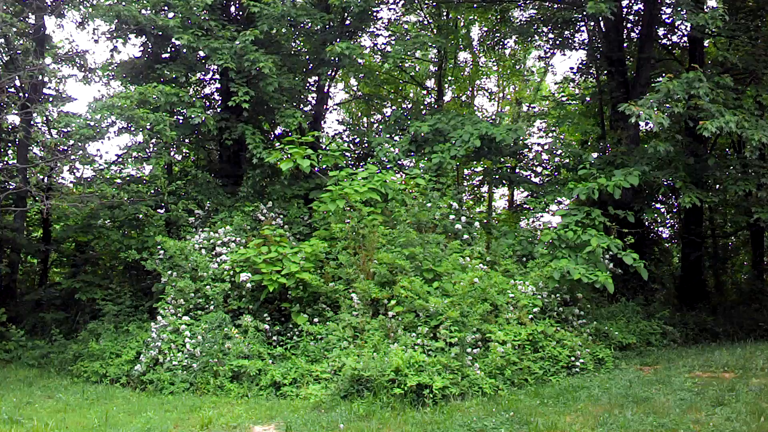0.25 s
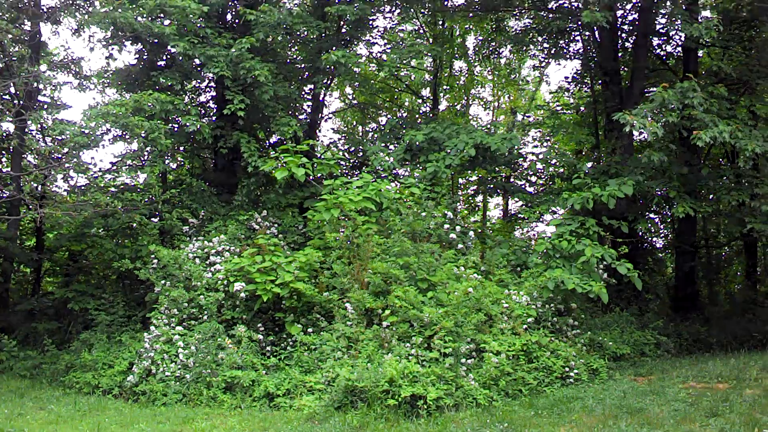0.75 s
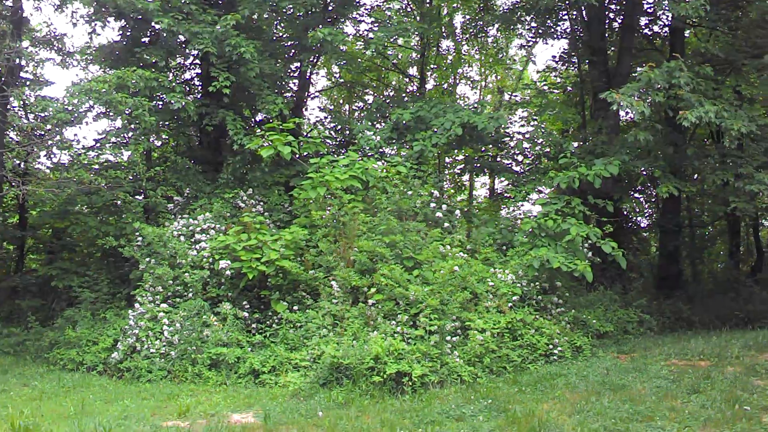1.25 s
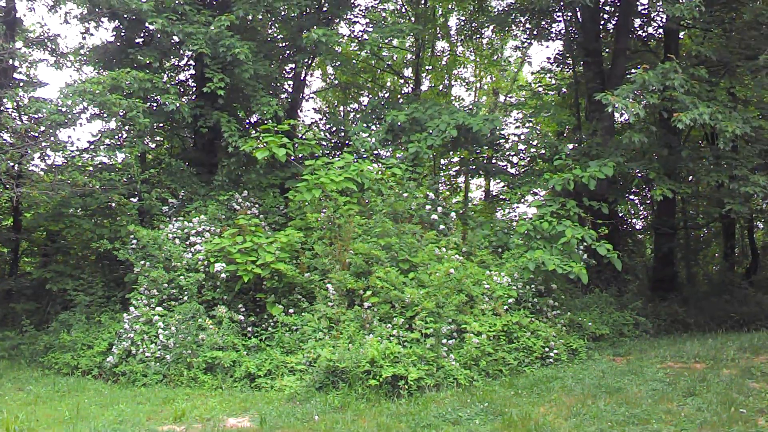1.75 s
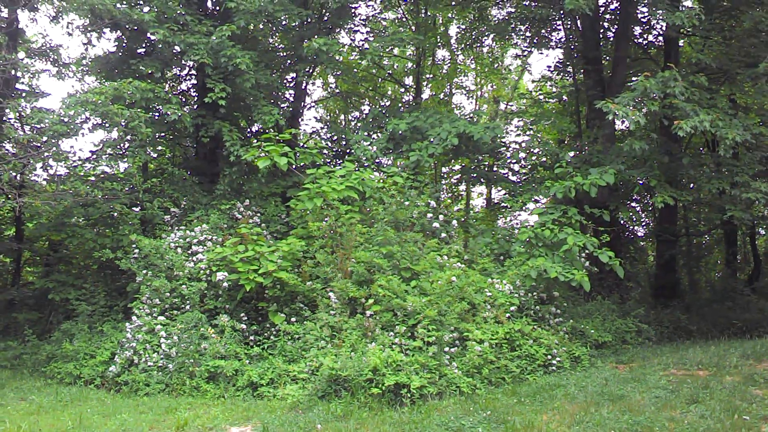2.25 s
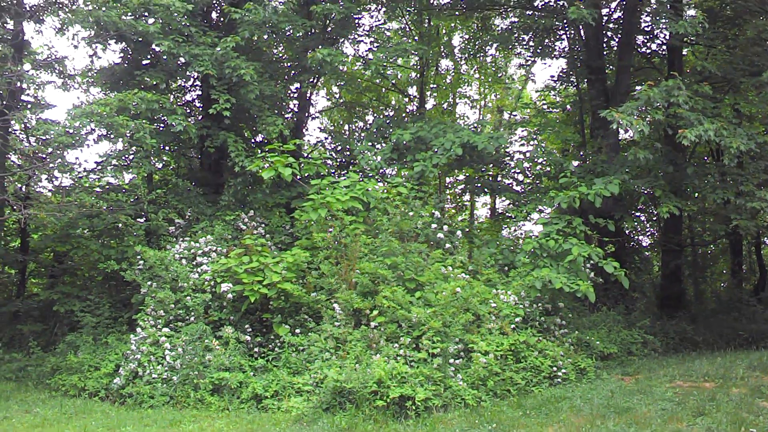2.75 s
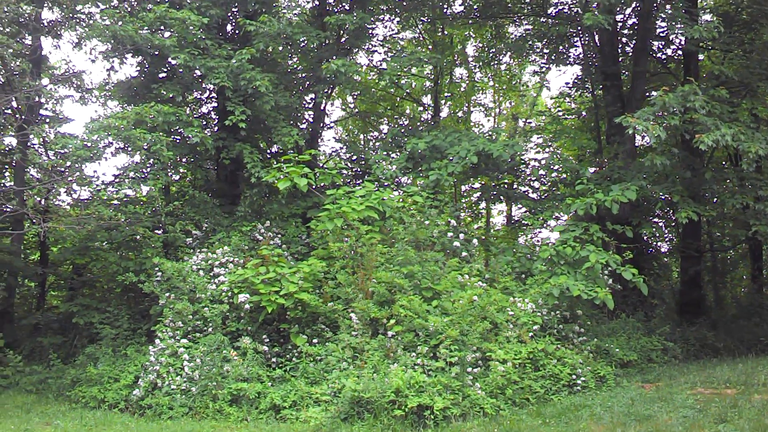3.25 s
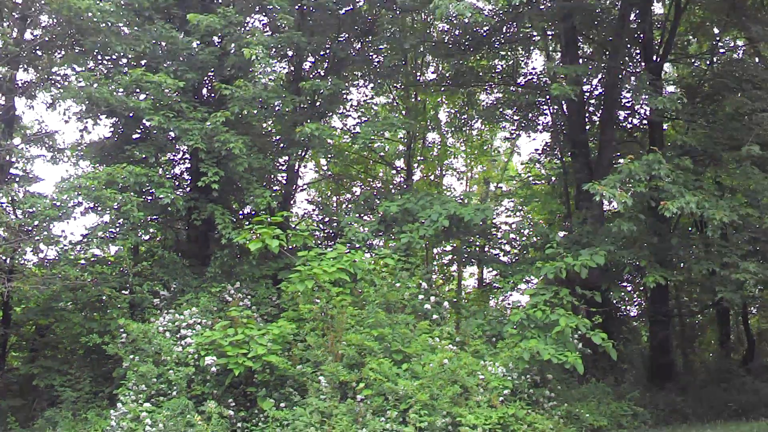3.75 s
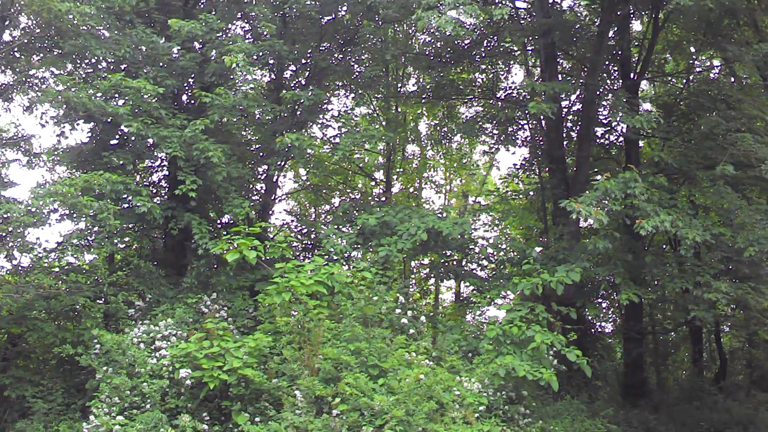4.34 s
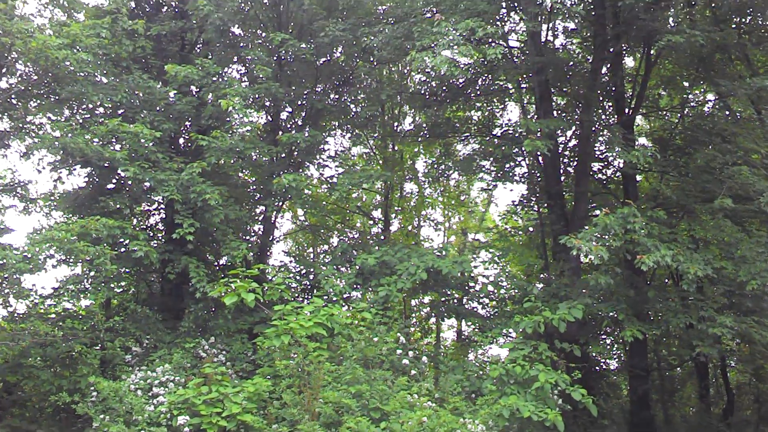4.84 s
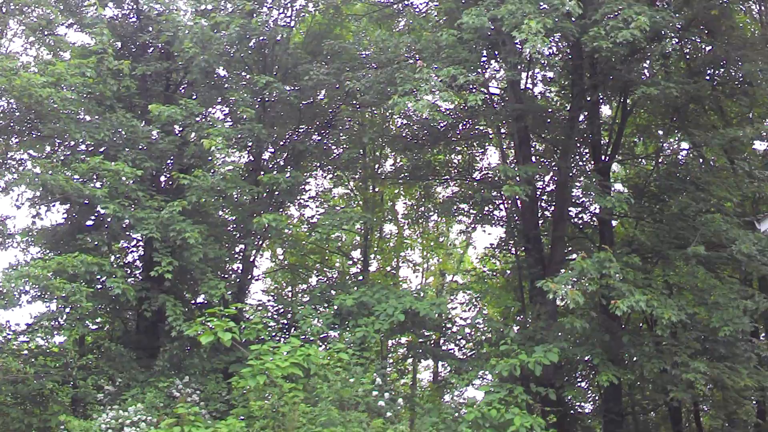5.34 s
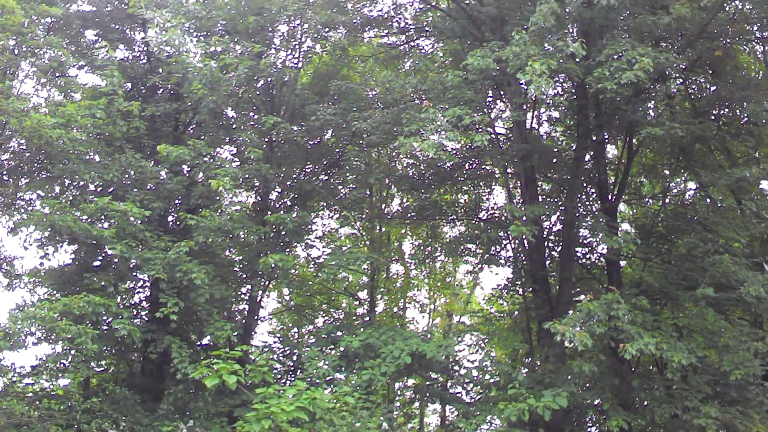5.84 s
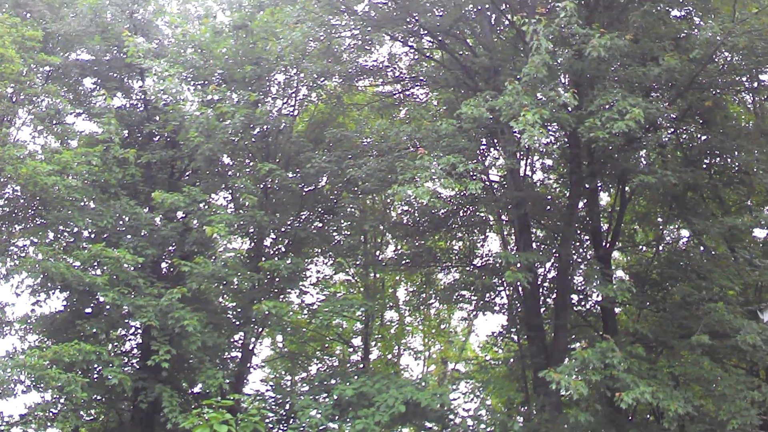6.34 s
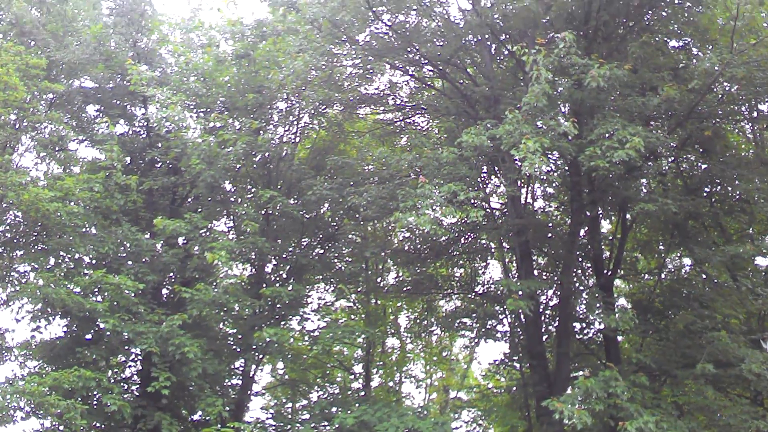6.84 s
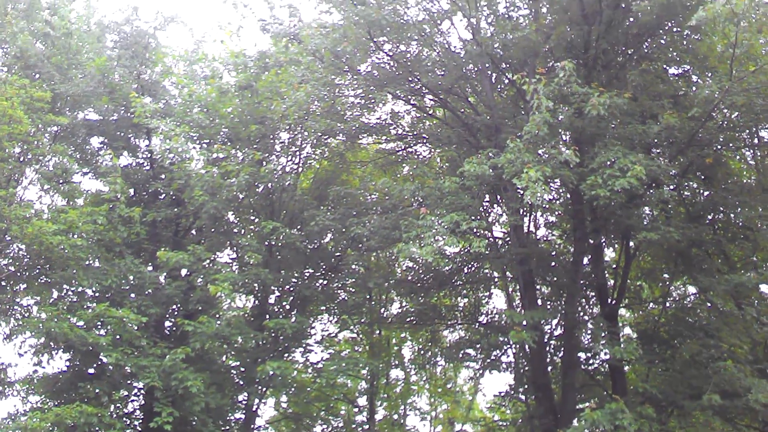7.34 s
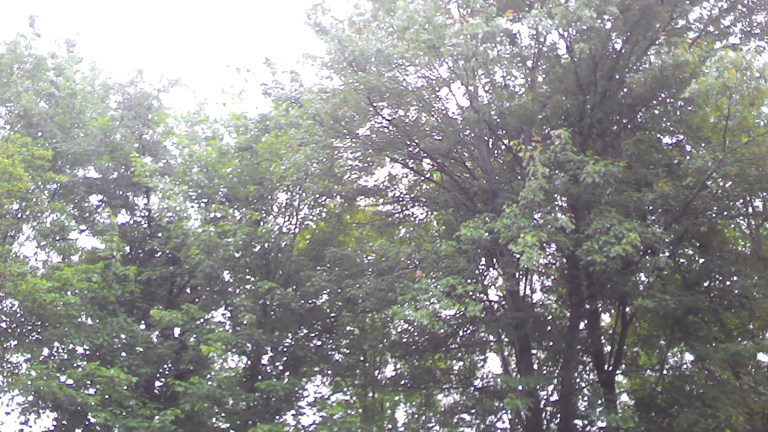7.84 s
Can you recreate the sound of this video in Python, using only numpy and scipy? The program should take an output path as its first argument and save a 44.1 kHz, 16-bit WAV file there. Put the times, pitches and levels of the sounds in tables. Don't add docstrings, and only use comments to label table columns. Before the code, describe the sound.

Loud, bright cicada hiss fills the trees over a faint low drone and far traffic, broken by short silences and finally turned down abruptly.

```python
import sys
import numpy as np
from scipy import signal
from scipy.io import wavfile
from scipy.ndimage import uniform_filter1d

SR = 44100
rng = np.random.default_rng(int(sys.argv[2]) if len(sys.argv) > 2 else 0)


def transcribe(u):
    v = np.clip(np.atleast_2d(u).T, -1, 1)
    q = np.round(v * 32767).astype(np.int16)
    wavfile.write(sys.argv[1], SR, q)


def magnitude_from_level(level_db):
    exponent = np.asarray(level_db, float) / 20
    return 10 ** exponent


N = 356989
T = np.arange(N) / SR


def evened(x):
    return x / np.sqrt(np.mean(x ** 2) + 1e-20)


def curve(table, column):
    rows = np.array(table)
    return np.interp(T, rows[:, 0], rows[:, column])


def colour(x, spectrum):
    f, db = np.transpose(spectrum)
    hz = abs(np.fft.fftfreq(2 ** 14, 1 / SR))
    gain_db = np.interp(np.log(hz + 1), np.log(f + 1), np.maximum(db, -90))
    log_gain = gain_db * np.log(10) / 20
    response = np.exp(np.conj(signal.hilbert(log_gain)))
    taps = np.fft.ifft(response).real[:2 ** 13]
    return signal.oaconvolve(x, taps)[:len(x)]


def add(mix, start_s, sound):
    part = mix[round(start_s * SR):][:len(sound)]
    part += sound[:len(part)]


def ring(x, hz, width_hz):
    r = np.exp(-np.pi * width_hz / SR)
    return signal.lfilter([1, -r], [1, -2 * r * np.cos(2 * np.pi * hz / SR), r * r], x)


def glide(start_hz, end_hz, length_s):
    hz = np.linspace(start_hz, end_hz, round(length_s * SR))
    return np.cumsum(hz) / SR, np.hanning(len(hz)) ** .5


def tymbals(count, low_hz, high_hz, jitter, spread_db, phrase_s):
    snaps_each = 4000
    rate, far, turn, pace = rng.random((count, 4)).T[:, :, None]
    rate_hz = low_hz + (high_hz - low_hz) * rate
    shake = np.clip(rng.standard_normal((count, snaps_each)), -2, 2)
    snap_s = np.cumsum((1 + jitter * shake) / rate_hz, axis=1) - turn / rate_hz
    own_phrase_s = phrase_s * (0.7075 + 0.609 * pace)
    phrase = np.clip(0.57 + np.sin(2 * np.pi * (snap_s / own_phrase_s + turn)), 0, 1)
    in_out = (-1.) ** np.arange(snaps_each)
    size = magnitude_from_level(-spread_db * far) * phrase * in_out
    at = (snap_s * SR).astype(int)
    keep = (at >= 0) & (at < N)
    return np.bincount(at[keep], size[keep], N)


def buzzers():
    # (time [s], level [dB])
    swell = [(.3, -19.5), (1, -19), (1.7, -18.5), (2.4, -18), (3, -18.5), (3.6, -19.4), (4.1, -20),
             (4.55, -20.4), (5.1, -20), (5.8, -19.5), (6.4, -19.5), (6.9, -19.5), (7.4, -20), (7.8, -19)]
    # (frequency [Hz], density [dB per Hz])
    body = [(1500, -64), (2200, -46), (2800, -36), (3500, -20), (4200, -11), (4800, -10), (5500, -1.5),
            (6000, 0.5), (6500, -2.5), (7200, -9), (8200, -11), (9900, -29.5), (11800, -34.5),
            (13600, -43.5), (16000, -48.5)]
    shoulder_db = 1.15
    snaps = tymbals(count=420, low_hz=250, high_hz=450, jitter=.3, spread_db=10.5, phrase_s=2.532)
    hiss = evened(colour(snaps, body))
    top = signal.sosfilt(signal.butter(2, 7000, "high", fs=SR, output="sos"), hiss)
    return magnitude_from_level(curve(swell, 1)) * (hiss + (magnitude_from_level(shoulder_db) - 1) * top)


def droners():
    # (time [s], level [dB])
    swell = [(.3, -50), (4, -51), (6.8, -50.5), (7.8, -54)]
    # (frequency [Hz], density [dB per Hz])
    body = [(600, -42), (950, -20), (1050, -17.5), (1110, -8.5), (1220, -6.5), (1290, 0), (1322, 1),
            (1360, -3.5), (1430, -8), (1520, -16), (1900, -29.5), (2500, -46)]
    snaps = tymbals(count=150, low_hz=120, high_hz=260, jitter=.35, spread_db=15.5, phrase_s=2.176)
    return magnitude_from_level(curve(swell, 1)) * evened(colour(snaps, body))


def traffic():
    # (frequency [Hz], density [dB per Hz])
    rumble_body = [(8.8, -51), (15, -13), (48, 0), (66, 1.5), (87, -3.5), (123, -3.5), (141, -8.5),
                   (160, -13), (231, -18.5), (300, -29.5), (390, -54), (660, -120)]
    # (frequency [Hz], density [dB per Hz])
    wash_body = [(150, 9.5), (300, 5), (500, 1), (1000, 0), (2000, -6), (3000, -7), (8000, -9),
                 (15500, -17)]
    # (time [s], level [dB])
    passing = [(.4, -54), (1.7, -54.5), (3.6, -53.5), (5.2, -52.5), (7, -52.5), (7.7, -53.5)]
    rumble_db, swell_db, swell_s = -44.5, 1.5, .15
    rumble = evened(colour(rng.standard_normal(N), rumble_body))
    wash = evened(colour(rng.standard_normal(N), [(40, -38)] + wash_body))
    span = round(swell_s * SR)
    swell = evened(uniform_filter1d(uniform_filter1d(rng.standard_normal(N), span), span))
    return magnitude_from_level(rumble_db + swell_db * swell) * rumble + magnitude_from_level(curve(passing, 1)) * wash


def circuit_whine():
    # (frequency [Hz], level [dB])
    tones = [(15702.5, -80), (15726.5, -77.5)]
    return sum(np.sqrt(2) * magnitude_from_level(db) * np.sin(2 * np.pi * hz * T) for hz, db in tones)


def engine(course, orders, waver):
    drift = evened(uniform_filter1d(uniform_filter1d(rng.standard_normal(N), 3000), 3000))
    turns = np.cumsum(curve(course, 1) * (1 + waver * drift)) / SR
    tone = sum(magnitude_from_level(db) * np.sin(2 * np.pi * multiple * turns) for multiple, db in orders)
    start_s, stop_s = course[0][0], course[-1][0]
    fade_in = np.clip((T - start_s) / 0.192, 0, 1)
    fade_out = np.clip((stop_s + 0.16 - T) / 0.23, 0, 1)
    return np.sqrt(2) * magnitude_from_level(curve(course, 2)) * fade_in * fade_out * tone


def far_engine():
    # (time [s], firing rate [Hz], level [dB])
    course = [(.5, 117.7, -45), (.9, 121.3, -56), (1.4, 132.2, -54), (2, 136.9, -55.5), (3, 140.4, -55.5),
              (3.5, 140.7, -60)]
    # (multiple of firing rate, level [dB])
    orders = [(.43, -5), (1, 0), (1.55, -11), (1.8, -12)]
    return engine(course, orders, waver=0.011)


def bird():
    # (time [s], peak [dB], start [Hz], fall [Hz], length [s])
    chips = [(1.903, -45, 1193, 79.9, .04), (1.955, -53, 2230, 140, .035), (1.985, -55, 1800, 80, .025),
             (2.009, -51, 2270, 270, .03), (2.015, -54, 1830, 200, .036), (3.603, -59, 2330, 130, .035),
             (3.613, -60, 2100, 50, .025), (3.971, -59, 2297, 130, .039), (4.291, -63, 2080, 50, .053),
             (4.38, -52.5, 2333, 180, .045), (4.786, -53, 2360, 220, .07), (5.205, -52, 2297, 120, .05),
             (5.255, -56, 2230, 60, .03)]
    out = np.zeros(N)
    for start_s, db, hz, fall_hz, length_s in chips:
        turns, window = glide(hz, hz - fall_hz, length_s)
        add(out, start_s, magnitude_from_level(db) * window * np.sin(2 * np.pi * turns))
    return woods(out, t60_s=.18, wet_db=-5)


def woods(x, t60_s, wet_db):
    t = np.arange(SR // 2) / SR
    tail = rng.standard_normal(len(t)) * magnitude_from_level(-60 * t / t60_s) * (1 - np.exp(-t / 0.027))
    return x + magnitude_from_level(wet_db) * signal.oaconvolve(x, tail / np.linalg.norm(tail))[:N]


def near_engine():
    # (time [s], firing rate [Hz], level [dB])
    course = [(2.5, 100.1, -47.5), (3.36, 105.4, -57), (3.54, 107.2, -43.5), (4.4, 120.3, -46.5),
              (5.49, 133, -43), (6.25, 123.7, -45.5), (6.9, 119.6, -44.5), (7.42, 109.5, -42.5),
              (7.68, 102.5, -52)]
    # (multiple of firing rate, level [dB])
    orders = [(.6, -8), (1, 1), (2, -23.5)]
    return engine(course, orders, waver=0.0071)


def steady_motor():
    # (time [s], rate [Hz], level [dB])
    course = [(2.5, 207, -56), (2.9, 214.8, -61.5), (4.1, 216.4, -61.5), (4.4, 216, -69)]
    # (multiple of rate, level [dB])
    orders = [(1, 1), (.87, -3), (1.38, -5.5)]
    # (time [s], rate [Hz], level [dB])
    geared_course = [(3.6, 249.7, -73), (4.3, 246.5, -60), (5.3, 246.7, -59.5), (6.2, 246, -63.5),
                     (6.8, 238.2, -61), (7.4, 228.4, -63)]
    # (multiple of rate, level [dB])
    geared_orders = [(1, 0), (1.2, -5.5), (.8, -6)]
    return engine(course, orders, waver=0.0103) + engine(geared_course, geared_orders, waver=0.0099)


def housing_ticks():
    # (time [s], peak [dB], ring [Hz], ring width [Hz])
    ticks = [(3.065, -36, 400, 700), (3.111, -33, 1300, 1200), (3.111, -39, 400, 500),
             (3.527, -34, 1200, 1000), (3.545, -34, 1100, 1000), (5.144, -34, 1500, 4000),
             (5.572, -40, 450, 500), (6.9185, -22, 2300, 3000), (6.9285, -33, 380, 400),
             (6.9287, -25, 11000, 9000), (7.091, -29, 1900, 1800), (7.098, -33, 2300, 1000),
             (7.188, -36, 650, 500)]
    out = np.zeros(N)
    blow = np.r_[1., np.zeros(600)]
    for start_s, db, hz, width_hz in ticks:
        add(out, start_s, magnitude_from_level(db) * ring(blow, hz, width_hz))
    return out


def finger_rubs():
    # (time [s], level [dB], length [s], centre [Hz], width [Hz])
    rubs = [(3.08, -55, .05, 1650, 300), (3.527, -55, .06, 750, 501), (3.592, -52, .045, 2250, 500),
            (4.15, -57, .04, 2200, 700), (5.131, -50, .05, 900, 2000), (6.959, -58, .06, 1650, 399)]
    out = np.zeros(N)
    for start_s, db, length_s, hz, width_hz in rubs:
        grit = rng.standard_normal(round(length_s * SR))
        rub = ring(ring(grit, hz, width_hz), hz, width_hz)
        add(out, start_s, magnitude_from_level(db) * np.hanning(len(rub)) * evened(rub))
    return out


def housing_creaks():
    # (time [s], level [dB], slip rate [Hz], length [s], shell mode [Hz])
    creaks = [
        (3.518, -49, 400, .04, 430),
        (6.976, -49, 385, .038, 750),
        (7.112, -42, 462, .031, 1480),
    ]
    slowing, damping = .17, .7
    out = np.zeros(N)
    for start_s, db, slip_hz, length_s, hz in creaks:
        turns, window = glide(slip_hz, slip_hz * (1 - slowing), length_s)
        width_hz = damping * hz
        slips = np.diff(np.floor(turns), prepend=0)
        pushes = uniform_filter1d(slips, size=13)
        creak = ring(ring(pushes, hz, width_hz), hz, width_hz)
        add(out, start_s, magnitude_from_level(db) * window * evened(creak))
    return out


def scene():
    mix = buzzers() + droners() + traffic() + circuit_whine()
    mix = mix + far_engine() + bird() + near_engine() + steady_motor()
    mix = mix + housing_ticks() + finger_rubs() + housing_creaks()
    return np.array([mix, mix])


def band_limit(x):
    return signal.sosfilt(signal.butter(12, 16520, fs=SR, output="sos"), x)


def record(dry):
    # (time [s], peak [dB], width [samples])
    skips = [
        (.0583, -19, 3),
        (4.5062, -26, 11),
        (4.5122, -22, 3),
    ]
    # (start [s], stop [s], fade-in [s], fade-out [s])
    playing = [
        (.0458, .0794, .003, .0008),
        (.2662, 4.5129, .003, .0003),
        (4.6238, 9, .0003, .001),
    ]
    # (time [s], gain [dB])
    last_step = (7.8243, -12)
    clicks = np.zeros(N)
    for start_s, db, width in skips:
        add(clicks, start_s, magnitude_from_level(db) * np.hanning(width))
    on = np.zeros(N)
    for start_s, stop_s, rise_s, fall_s in playing:
        on += np.clip(np.minimum((T - start_s) / rise_s, (stop_s - T) / fall_s), 0, 1)
    step_s, step_db = last_step
    gain = np.where(T < step_s, 1, magnitude_from_level(step_db))
    edge = signal.firwin(2401, 15752, window=("kaiser", 8), fs=SR)
    mix = signal.oaconvolve((dry + clicks) * on * gain, edge[None], "same")
    return band_limit(mix)


dry = scene()
out = record(dry)
transcribe(out)
```